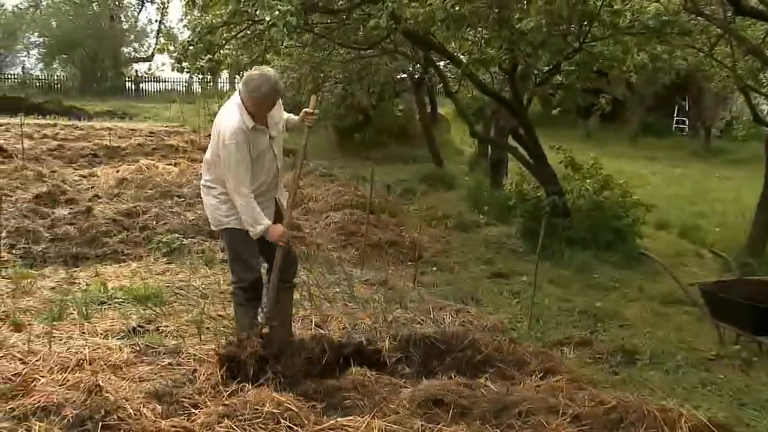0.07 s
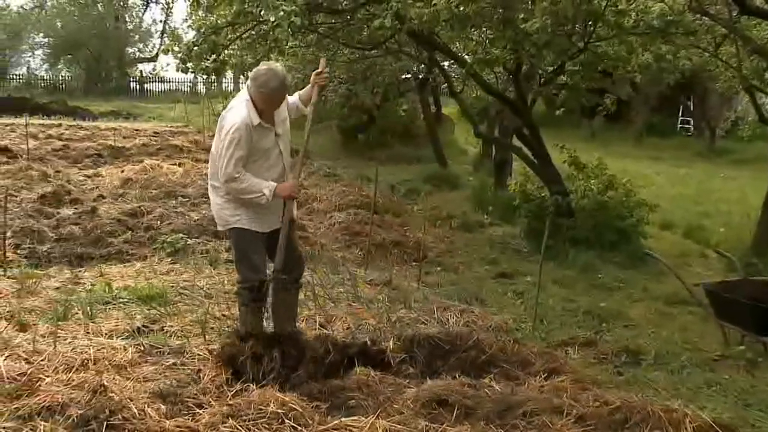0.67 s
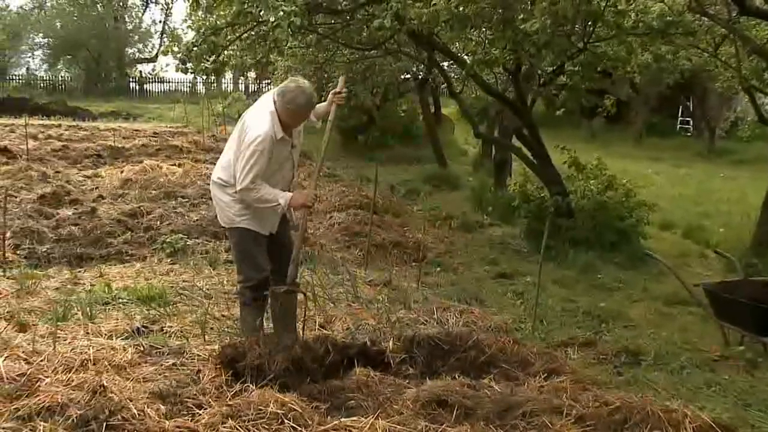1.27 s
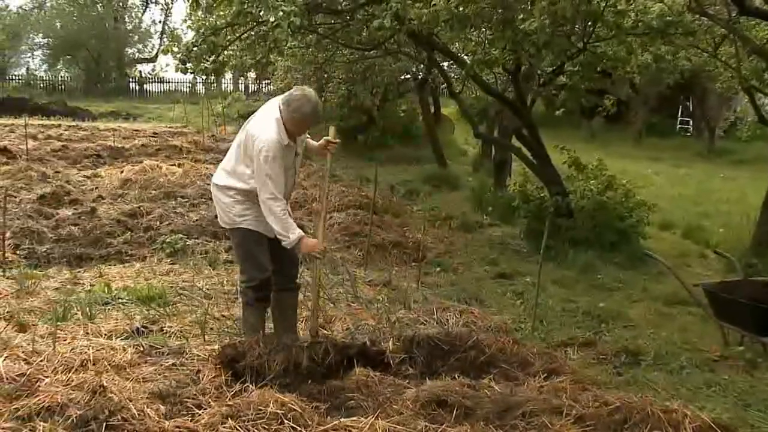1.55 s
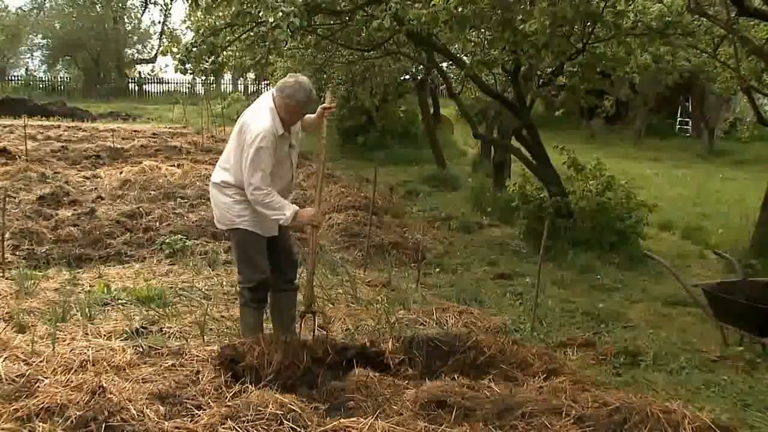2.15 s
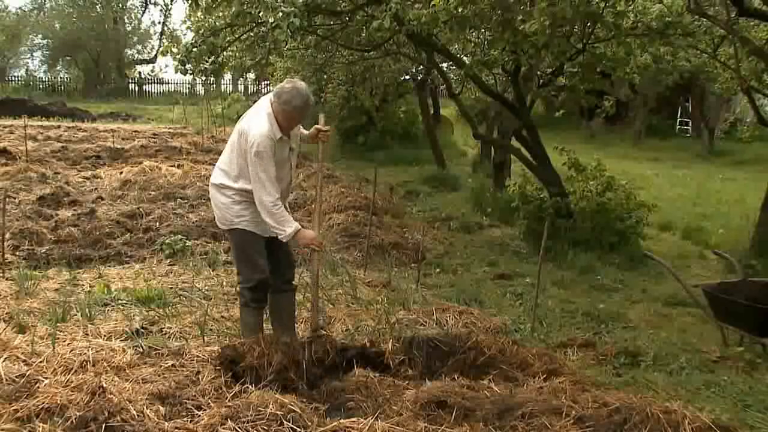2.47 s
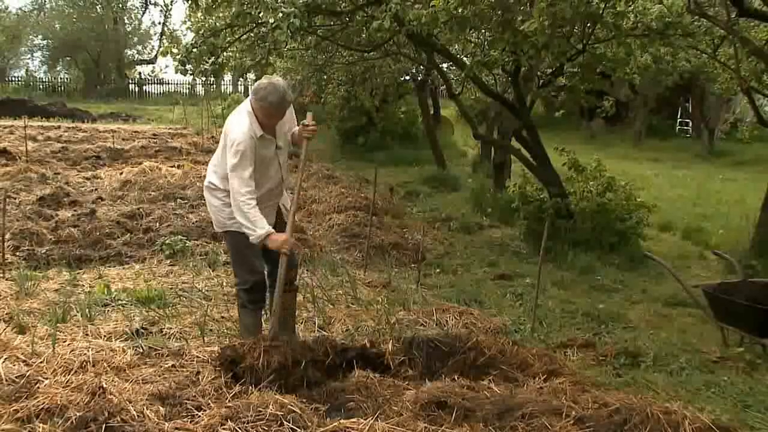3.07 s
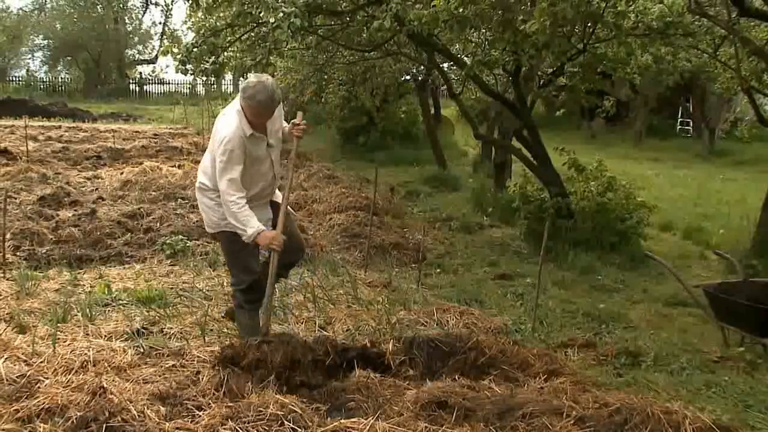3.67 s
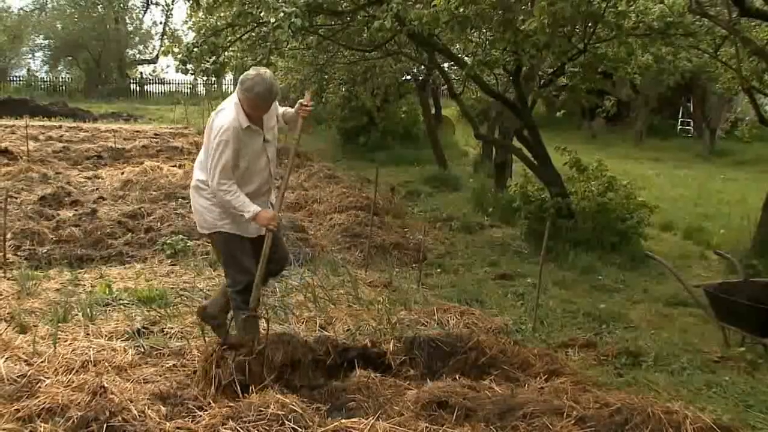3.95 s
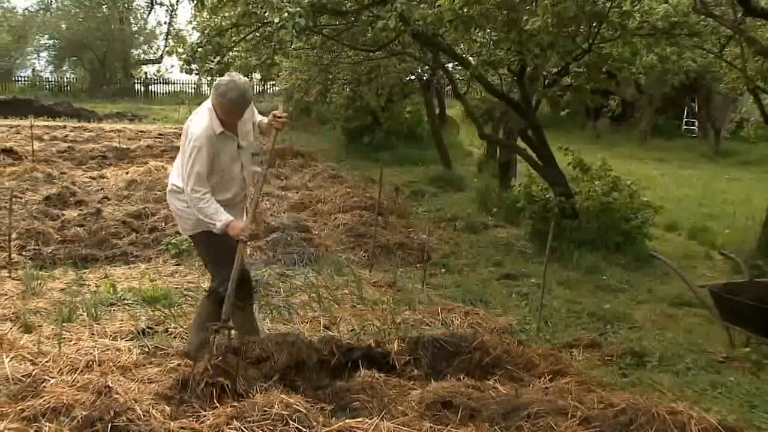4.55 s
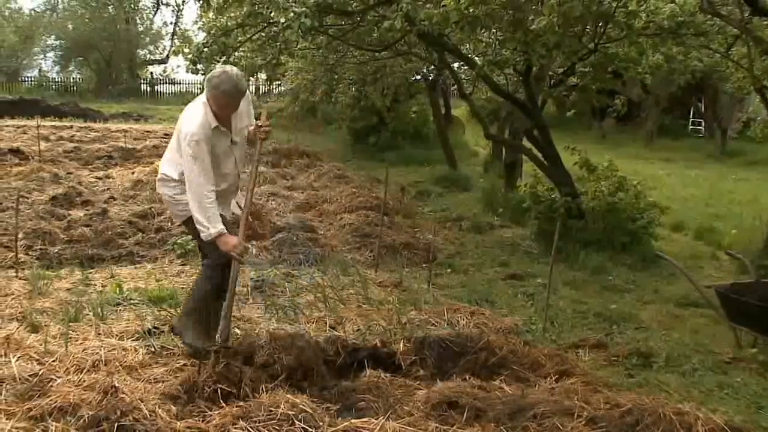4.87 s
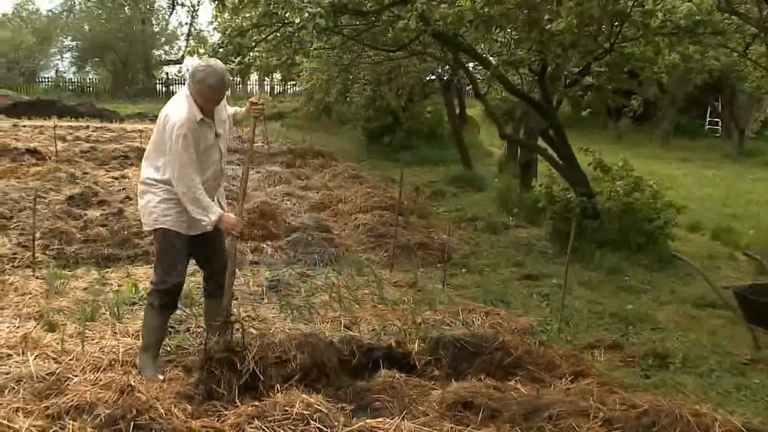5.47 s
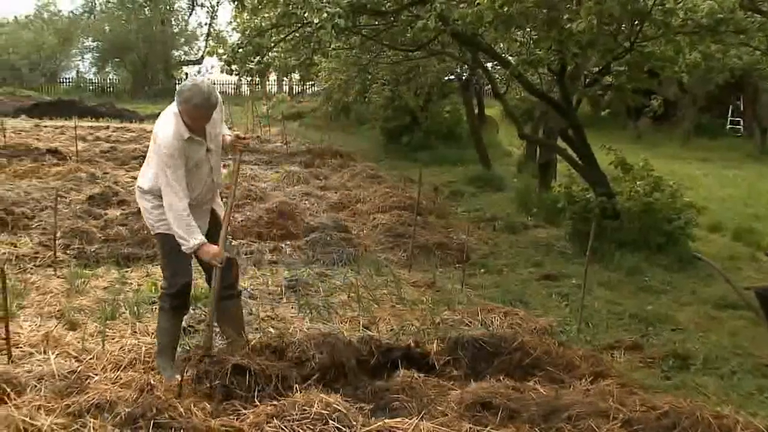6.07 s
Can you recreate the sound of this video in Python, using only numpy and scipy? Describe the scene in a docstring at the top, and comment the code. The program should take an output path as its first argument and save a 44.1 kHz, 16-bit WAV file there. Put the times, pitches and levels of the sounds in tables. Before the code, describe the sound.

A garden fork clacks and scrapes into straw mulch and soil, with dry crackling, clothing swishes and soft thuds outdoors.

```python
"""First come a crunch of straw and a swish of clothing, then the sharp clack of a garden fork driven into
mulch and soil, close by and outdoors. Each stab excites the fork's damped modes and overloads the
microphone; gritty slips follow as the tines catch and let go. Between stabs stalks crackle, cloth twice
zips faintly, and boots and clods thud on soft ground. A tapped tine pings twice, and a far bird gives
one soft note over the quiet air."""
import sys
import numpy as np
from scipy import signal
from scipy.fft import rfft, irfft
from scipy.io import wavfile

SR = 44100
rng = np.random.default_rng(int(sys.argv[2]) if len(sys.argv) > 2 else 0)


def wav_record(signal):
    """Record a signal, one row per channel, as 16-bit PCM in the file named by sys.argv[1]."""
    frames = np.transpose(np.atleast_2d(signal))
    bounded = np.clip(frames, -1, 1)
    # unit amplitude maps onto the largest positive 16-bit level
    quanta = np.round(bounded * 32767).astype(np.int16)
    wavfile.write(sys.argv[1], SR, quanta)


N = 278700
TIME = np.arange(N) / SR

# Spectra of open air, handling rumble, dragged soil, crushed straw and brushed cloth.
# Each row: frequency in Hz, relative spectral density in dB.
AIR_SPECTRUM = [(20, 12), (100, 9.5), (200, 1), (500, -8.5), (1000, -5), (1900, -22.5), (3000, -16),
                (8000, -30.5), (16000, -20.5)]
RUMBLE_SPECTRUM = [(12, -27), (20, 7), (70, 7.5), (123, 0.5), (156, -4.5), (275, -13), (400, -15.5),
                   (520, -45), (880, -120)]
SOIL_SPECTRUM = [(130, -2), (220, -2.5), (450, -2.5), (700, -8), (950, -5), (1300, -14), (1900, -13)]
STRAW_SPECTRUM = [(700, -1), (1200, -2.5), (1550, 4.5), (1820, 4), (2200, 2), (2700, -4), (3500, -5),
                  (4800, -2), (5600, -5.5), (6600, -7.5), (8500, -10), (12000, -28)]
CLOTH_SPECTRUM = [(2000, -0.5), (5000, -7.5), (7500, -7.5), (11500, -3.5), (14000, -9.5), (16000, -11.5)]
# The bird's note. Each row: time in seconds, pitch in Hz, level in dB.
BIRD_NOTE = [(.72, 479, -59), (.76, 494, -50), (.8, 487, -50), (.85, 480, -80)]
# Sliding cloth, one list a slide. Each row: time in seconds, threads crossed per second, gain in dB.
CLOTH_SLIDES = [
    [(.84, 9900, -68), (.88, 10600, -55), (.96, 11300, -55), (1.05, 11600, -53), (1.125, 12500, -46),
     (1.19, 11200, -50), (1.25, 11300, -50), (1.34, 10500, -50), (1.42, 10200, -52), (1.48, 9800, -62)],
    [(4.68, 8800, -62), (4.73, 11700, -52), (4.78, 12400, -49), (4.87, 11000, -52), (4.93, 12000, -50),
     (4.98, 12700, -47), (5.03, 11500, -50), (5.07, 9700, -59)],
]
# Folds of that cloth. Each row: speed as a ratio, relative level in dB.
CLOTH_FOLDS = [(.76, -12), (.86, -10), (.95, -2), (1.01, -3), (1.05, -9), (1.1, -5), (1.27, -12)]
# Steady rustle, one list a stroke of work. Each row: time in seconds, relative level in dB.
WORK_STROKES = [
    [(0.0, -42), (0.298, -40), (0.676, -47), (0.78, -53)],
    [(0.82, -56), (1.05, -48.5), (1.746, -41), (1.96, -65)],
    [(2.0, -83), (2.392, -50.5), (2.554, -47), (2.7, -50.5)],
    [(2.74, -52.5), (3.162, -51), (3.368, -50), (3.5, -52)],
    [(3.7, -52), (4.372, -52), (4.494, -43), (4.75, -48.5)],
    [(4.8, -45), (5.12, -44), (6.092, -40.5), (6.32, -36.5)],
]
# The course of the low rumble. Each row: time in seconds, level in dB.
RUMBLE_CURVE = [(0.0, -43), (0.44, -38), (0.67, -50), (1.49, -48), (1.67, -38), (1.92, -49.5), (2.48, -45),
                (2.75, -54), (3.2, -45), (3.47, -62), (4.35, -49), (4.49, -38.5), (4.68, -51.5),
                (4.91, -47), (5.1, -40.5), (5.58, -38), (5.84, -40.5), (6.32, -36.5)]
# Boot or fork presses the mulch. Each row: peak time, rise and fall in seconds, straw and soil in dB.
MULCH_PRESSES = [(0.109, 0.051, 0.055, -32, -42), (0.2, 0.017, 0.24, -42.5, -50.5),
                 (0.39, 0.013, 0.051, -36.5, -47), (1.15, 0.33, 0.11, -47.5, -44),
                 (1.56, 0.045, 0.02, -39, -40.5), (1.92, 0.085, 0.031, -45, -50),
                 (2.077, 0.017, 0.014, -32, -37.5), (2.15, 0.097, 0.18, -42, -41),
                 (2.43, 0.07, 0.09, -42.5, -45.5), (3.025, 0.11, 0.058, -37, -40),
                 (3.165, 0.054, 0.042, -42, -42.5), (3.81, 0.026, 0.11, -37, -38.5),
                 (4.416, 0.059, .03, -39.5, -47.5), (4.61, 0.05, 0.026, -46, -54),
                 (4.92, 0.037, 0.044, -29, -37.5), (5.116, 0.054, 0.02, -36, -44),
                 (5.3, 0.059, 0.067, -37.5, -39), (5.495, 0.055, 0.014, -36, -42),
                 (5.72, 0.3, 0.21, -42.5, -45), (6.083, 0.031, 0.019, -24.5, -26.5),
                 (6.215, 0.034, 0.13, -41.5, -62)]
# Cloth brushes over itself. Each row: peak time, rise and fall in seconds, relative level in dB.
CLOTH_BRUSHES = [(0.088, 0.028, 0.027, -25.5), (0.19, 0.013, 0.1, -37), (0.47, 0.064, 0.1, -39.5),
                 (1.06, 0.078, 0.045, -34), (1.22, .1, .1, -46), (2.14, 0.12, 0.09, -39),
                 (2.41, 0.064, 0.14, -39), (2.785, 0.031, 0.04, -33.5), (4.085, 0.017, 0.033, -47),
                 (4.39, 0.049, .03, -48), (5.116, 0.036, 0.037, -30), (5.296, 0.077, .04, -36),
                 (5.66, 0.28, 0.43, -42)]
# Boots and clods land. Each row: start in seconds, strength in dB.
GROUND_IMPACTS = [(0.374, -24), (0.516, -26.5), (0.585, -28.5), (2.601, -25.5), (3.2, -28), (3.928, -24.5),
                  (5.058, -25.5), (5.437, -21.5), (5.508, -24), (5.724, -20), (6.036, -21.5), (6.221, -33)]
# Light taps on a free tine. Each row: start in seconds, strength in dB.
TINE_TAPS = [(1.177, -35.5), (3.737, -35)]
# Modes of a free tine, and of the fork damped by soil and hands.
# Each row: frequency in Hz, relative level in dB, time to decay by 60 dB in seconds.
TINE_MODES = [(940, -5.5, 0.3), (1790, -4.5, 0.12), (1950, 5.5, 0.042), (3360, -7.5, 0.13), (4950, -8, .04)]
FORK_MODES = [(517, -6, 0.021), (630, -4.5, 0.0076), (992, -3, 0.028), (1182, -7, 0.014), (1448, -1, 0.027),
              (1638, 14.5, 0.004), (1834, 12, 0.026), (2077, -5.5, 0.042), (2430, -57, 0.0033),
              (3128, -13, 0.04), (4100, -4, 0.055), (3945, -9, 0.012), (4430, -4.5, 0.025),
              (4596, -3, 0.017), (5190, -7.5, 0.017), (6700, -17, 0.059), (6540, -14, 0.0365),
              (8060, -33, 0.019), (8320, -1, 0.013), (8610, 2, 0.019), (11200, -25, 0.0138),
              (12500, -3.5, 0.012), (12300, 4.5, .018)]
# The four bands of a contact: knock, ring, scrape and crack. Each entry: band edge in Hz.
BAND_EDGES_HZ = [420, 1300, 2600, 6500, 16000]
# The balance of those bands. Each row: relative level in dB, dB gained per dB of hardness.
BAND_BALANCE = [(-5.5, -0.78), (1, 0), (-2.5, .5), (-14.5, 1.29)]
# The tines catch and slip. Each row: start and length in seconds, relative level in dB,
# hardness in dB (soil below 0, grit above).
FORK_SLIPS = [(0.108, 0.0014, -21.5, 3), (0.241, 0.0049, -33, 0), (0.446, .0056, -34.5, 3),
              (1.568, 0.0052, -13, 6.5), (1.632, .002, -30, -9), (1.645, 0.0015, -27, 1),
              (1.6775, .003, -17, 6), (1.694, 0.014, -26.5, 5), (1.719, 0.011, -29, 3),
              (1.737, 0.011, -28.5, 1), (1.7675, 0.0019, -27, 7.5), (2.066, 0.0075, -31.5, -1),
              (2.523, 0.0025, -27.5, -8.5), (2.53, .04, -36.5, -3), (2.573, 0.003, -25, -10.5),
              (2.596, 0.0018, -26.5, -16), (2.607, 0.02, -40.5, -1), (2.855, 0.0017, -38.5, -14),
              (3.169, .005, -19.5, -7.5), (3.178, 0.015, -28, -1), (3.264, 0.0061, -35.5, -5),
              (3.333, 0.0048, -34.5, 1), (3.344, 0.021, -36, 0), (3.8097, 0.0097, -22, 8),
              (3.875, 0.011, -22, 3), (3.9043, 0.004, -23.5, 0), (3.911, .0047, -21.5, 7),
              (3.947, 0.024, -39, 1.5), (4.4195, 0.0037, -15.5, -9), (4.458, 0.0029, -21.5, 2),
              (4.498, 0.0017, -30, -7), (4.517, .012, -23, 2), (4.549, 0.014, -29, -8),
              (4.569, 0.013, -25.5, 6.5), (4.591, 0.0023, -31.5, 7), (4.637, 0.0018, -40, 6),
              (5.022, 0.0029, -36.5, 1), (5.325, 0.0086, -42.5, -19), (5.506, 0.0036, -30, 0),
              (6.132, .014, -34.5, 0.5), (6.184, 0.0038, -33, 1), (6.221, 0.0086, -42, 12)]
# The fork is driven in. Each row: start and length in seconds; relative level, hardness, knock, crack
# and grind in dB; the second tine's delay in seconds and relative level in dB; soil thud in dB.
FORK_STABS = [(0.4081, 0.0022, -4, 6, -5, -6, -23, .0153, -9.5, -32.5),
              (1.5699, 0.0011, -6, 2.5, -3.5, 4, -11, .0158, 0.5, -21),
              (2.461, .0022, -2.5, 0.5, 0, 2, -13.5, .0055, -1, -31),
              (3.1881, 0.0029, -1, 0.5, -4, 6, -30, .017, -24, -25),
              (3.288, .0026, -11, 4, -22, -7.5, -46, .004, -26, -38),
              (3.8154, 0.00134, 0.5, -2.5, -9, 8, -32, 0.022, -22, -36),
              (4.4237, 0.0072, -7, 3.5, 0, 2, -16.5, .0157, -2, -31.5)]


def from_db(db):
    """Amplitude grows tenfold for every 20 dB."""
    return 10 ** (np.asarray(db) / 20)


def unit_rms(x):
    """Normalisation brings the mean power to 1."""
    return x / np.sqrt(np.mean(x ** 2) + 1e-20)


def band(x, low, high, order=2):
    """A causal band-pass filter attenuates what lies outside low to high Hz."""
    edges = [low, min(high, .48 * SR)]
    return signal.sosfilt(signal.butter(order, edges, "band", fs=SR, output="sos"), x)


def colour(x, spectrum):
    """Filtering multiplies the signal's spectrum by the given one; the result has rms 1."""
    hz, db = np.transpose(spectrum)
    log_hz = np.log(np.fft.rfftfreq(N, 1 / SR) + 1)
    gain = from_db(np.interp(log_hz, np.log(hz), db, left=-90, right=-90))
    return unit_rms(irfft(rfft(x) * gain, N))


def drift(per_s):
    """Random modulation glides between Gaussian values, per_s of them a second."""
    knots = rng.standard_normal(4096)
    return np.interp(TIME * per_s, np.arange(len(knots)), knots)


def swell(s, rise, fall):
    """The envelope of a rounded push rises to 1 at time s and decays."""
    return np.exp(-np.clip((s - TIME) / rise, 0, 9) ** 1.42 - np.clip((TIME - s) / fall, 0, 9) ** 1.47)


def envelope(curve):
    """Straight lines between (seconds, dB) points give exponential growth and decay."""
    return from_db(np.interp(TIME, *np.transpose(curve)))


def resonate(x, hz, t60):
    """A damped oscillator answers a unit impulse with a decaying sine of height 1."""
    r, w = from_db(-60 / (t60 * SR)), 2 * np.pi * hz / SR
    return signal.lfilter([0, np.sin(w)], [1, -2 * r * np.cos(w), r * r], x + 1e-18)


def impulses(rows):
    """A brief force acts as an impulse, one for each (seconds, dB) row."""
    out = np.zeros(N)
    for s, db in rows:
        out[round(s * SR)] = from_db(db)
    return out


def grains(per_s, spread_db, size=N):
    """Tiny independent fractures form a Poisson train of uneven impulses."""
    born = rng.random(size) < per_s / SR
    return born * rng.choice([-1, 1], size) * from_db(spread_db * np.minimum(rng.exponential(1, size), 3))


def open_air(level_db=-54.5):
    """The background is stationary noise, strongest at low frequencies."""
    return from_db(level_db) * colour(rng.standard_normal(N), AIR_SPECTRUM)


def far_bird():
    """Attenuation over distance leaves only the fundamental of the note."""
    s, hz, db = np.transpose(BIRD_NOTE)
    gain = from_db(np.interp(TIME, s, db, left=-150, right=-150))
    return gain * np.sin(2 * np.pi * np.cumsum(np.interp(TIME, s, hz)) / SR)


def cloth_zip(gain_db=1.5):
    """Periodic friction whistles at the rate that threads cross; each fold slides at its own speed."""
    out = np.zeros(N)
    for slide in CLOTH_SLIDES:
        s, hz, db = np.transpose(slide)
        crossing_hz = np.interp(TIME, s, hz)
        gain = from_db(np.interp(TIME, s, db, left=-150, right=-150))
        for ratio, fold_db in CLOTH_FOLDS:
            # the weave is uneven, and each fold touches only now and then
            fold_hz = crossing_hz * ratio * (1 + .009 * drift(14) + .013 * drift(600))
            touch = from_db(fold_db + 3 * drift(16) + 3 * drift(250))
            out += gain * touch * np.sin(2 * np.pi * np.cumsum(fold_hz) / SR)
    return from_db(gain_db) * out


def rustle_gains(cloth_in_press_db=-5, jolt_db=-13.5):
    """Incoherent sources add in power: steady effort, presses, brushes and the jolt of each stab."""
    effort = envelope(np.vstack(WORK_STROKES))
    soil, straw, cloth = [(from_db(db) * effort) ** 2 for db in (-7, -4, -3)]
    rumble = envelope(RUMBLE_CURVE) ** 2
    for s, rise, fall, straw_db, soil_db in MULCH_PRESSES:
        push = swell(s, rise, fall)
        soil += (from_db(soil_db) * push) ** 2
        straw += (from_db(straw_db) * push) ** 2
        cloth += (from_db(straw_db + cloth_in_press_db) * push) ** 2
    for s, rise, fall, db in CLOTH_BRUSHES:
        cloth += (from_db(db) * swell(s, rise, fall)) ** 2
    for s, *_, thud_db in FORK_STABS:
        rumble += (from_db(thud_db + jolt_db) * swell(s, rise=0.022, fall=0.12)) ** 2
    return np.sqrt([soil, straw, cloth, rumble])


def straw_crackle(clump_db=2.5, flutter_db=1, snap_db=-14):
    """Brittle fracture: stalks of each thickness crackle in their own band, and single ones snap."""
    edges_hz = np.geomspace(700, 12000, 9)
    clumps = sum(band(grains(8000, spread_db=0.5), low, high) * from_db(clump_db * drift(60))
                 for low, high in zip(edges_hz, edges_hz[1:]))
    crackle = colour(clumps * from_db(flutter_db * drift(130)), STRAW_SPECTRUM)
    snaps = colour(grains(45, spread_db=9), STRAW_SPECTRUM)
    return crackle + from_db(snap_db) * snaps


def rustle(cloth_db=-4.5):
    """Friction makes noise, grainy in soil and straw, smooth in cloth; the movement rumbles below."""
    soil_gain, straw_gain, cloth_gain, rumble_gain = rustle_gains()
    soil = colour(grains(6000, spread_db=5.5), SOIL_SPECTRUM)
    straw = straw_crackle()
    cloth = colour(rng.standard_normal(N), CLOTH_SPECTRUM) * from_db(cloth_db + 2.4 * drift(70))
    rumble = colour(rng.standard_normal(N), RUMBLE_SPECTRUM)
    return soil_gain * soil + straw_gain * straw + cloth_gain * cloth + rumble_gain * rumble


def boots_and_clods(gain_db=-5):
    """Soft earth is a damped spring, answering each impact with a few low cycles."""
    pushes = impulses(GROUND_IMPACTS)
    motion = resonate(pushes, hz=86.6, t60=0.18) - 0.99 * resonate(pushes, hz=168, t60=0.078)
    return from_db(gain_db) * band(motion, 33, 192.5)


def soil_thuds(slip_db=-16.5, rise_s=0.0031, fall_s=0.012):
    """Earth yields inelastically, with a burst of dull noise under each stab and less under each slip."""
    stabs = [(s, thud_db) for s, *_, thud_db in FORK_STABS]
    slips = [(s, db + slip_db) for s, _, db, _ in FORK_SLIPS]
    pushes = impulses(stabs + slips) + 1e-18
    fall, rise = [signal.lfilter([1], [1, -np.exp(-1 / (s * SR))], pushes) for s in (fall_s, rise_s)]
    return 2 * (fall - rise) * unit_rms(band(rng.standard_normal(N), 135, 600))


def tine_pings():
    """Clear of the soil, a tapped tine vibrates freely in its natural modes."""
    taps = impulses(TINE_TAPS)
    return sum(from_db(db) * resonate(taps, hz, t60) for hz, db, t60 in TINE_MODES)


def contact(length, bands_db, release_s=0.0025, strike_db=7, modes_db=-27, crumbs_db=-23):
    """A blow and stick-slip friction radiate directly and through the fork's modes; crumbs trail after."""
    t = np.arange(SR // 6) / SR
    bite_s = 0.079 * length  # short blows bite at once, longer slips build up
    grip = np.minimum(t / bite_s, 1) * np.exp(-np.maximum(t - length, 0) / release_s)
    crumbs = from_db(crumbs_db) * np.exp(-t / (0.012 + length))
    force = grains(16000, spread_db=2.5, size=len(t)) * (grip + crumbs)
    force[np.argmax(t > bite_s)] += from_db(strike_db) * np.exp(-length / 0.0039)
    # where the tine is struck and how deep it sits change each mode's strength and tuning
    changes = rng.normal(0, [3.0, .007], (len(FORK_MODES), 2))
    sound = force.copy()
    for k, ((hz, db, t60), (change_db, detune)) in enumerate(zip(FORK_MODES, changes)):
        mode = resonate(force, hz * (1 + detune), t60)
        sound += (-1) ** k * from_db(modes_db + db + change_db) * mode
    sound = signal.sosfilt(signal.butter(2, 10500, fs=SR, output="sos"), sound)
    held_samples = np.sum(t < length + .001)
    out = np.zeros(len(t))
    for low, high, db in zip(BAND_EDGES_HZ, BAND_EDGES_HZ[1:], bands_db):
        part = band(sound, low, high, order=3)
        out += from_db(db) * part * np.sqrt(held_samples / np.sum(part ** 2))
    return out


def stab(s, length, db, hardness, knock, crack, grind_db, second_delay, second_db):
    """Impact gives way to friction: a tine strikes and grinds on, and a second meets softer ground."""
    blow = (s, length, db, hardness, knock, crack)
    grind = (s + length, 0.02, db + grind_db, hardness + 1, knock, crack - 7.5)
    second_tine = (s + second_delay, 0.002, db + second_db, hardness - 3.5, knock, crack + 1.5)
    return [blow, grind, second_tine]


def fork():
    """The harder the ground, the more energy each stab and slip puts into high frequencies."""
    out = np.zeros(N + SR)
    balance_db, per_hardness = np.transpose(BAND_BALANCE)
    stabs = [part for row in FORK_STABS for part in stab(*row[:-1])]
    slips = [(*row, 0, 0) for row in FORK_SLIPS]  # no extra knock or crack
    for s, length, db, hardness, knock, crack in stabs + slips:
        burst = contact(length, db + balance_db + hardness * per_hardness + [knock, 0, 0, crack])
        start = round(s * SR)
        out[start:start + len(burst)] += burst
    return out[:N]


def scene():
    """By superposition, air, digging, clothes and bird add into one channel."""
    air = open_air()
    digging = fork() + soil_thuds() + tine_pings() + boots_and_clods() + rustle()
    return (air + digging + cloth_zip() + far_bird())[None]


def record(dry, asymmetry_db=-10, cutoff_hz=16100):
    """Saturation flattens the hardest clacks, its asymmetry adds a low thump, and the top is cut."""
    clipped = dry / (1 + dry ** 8) ** (1 / 8)
    thump = from_db(asymmetry_db) * band(clipped ** 2, 5.3, 350, order=1)
    return signal.sosfilt(signal.ellip(10, .2, 70, cutoff_hz, fs=SR, output="sos"), clipped - thump)


dry = scene()
out = record(dry)
wav_record(out)
```